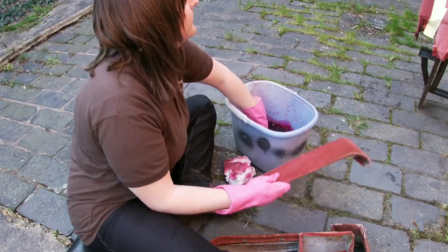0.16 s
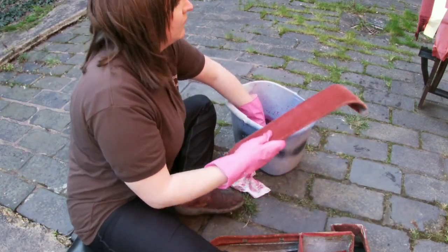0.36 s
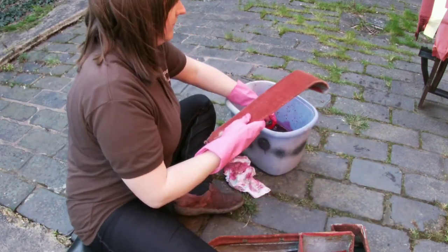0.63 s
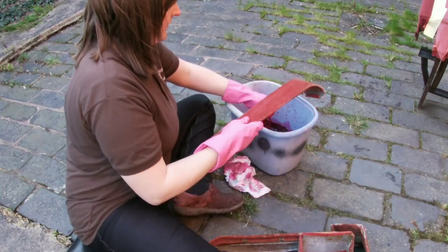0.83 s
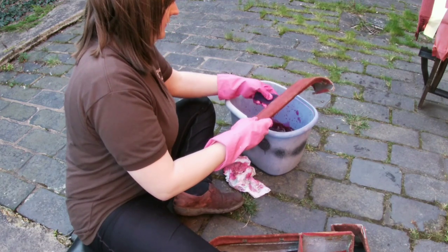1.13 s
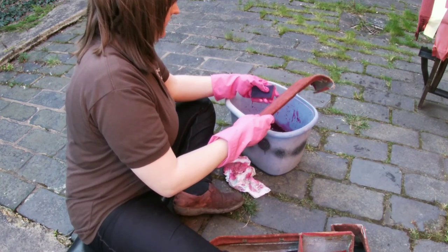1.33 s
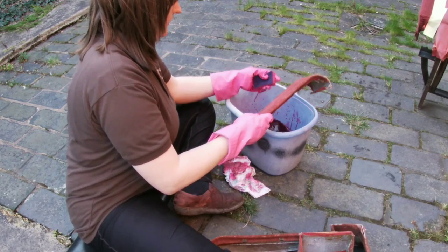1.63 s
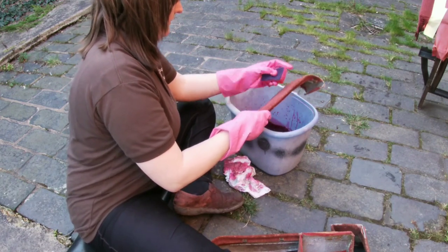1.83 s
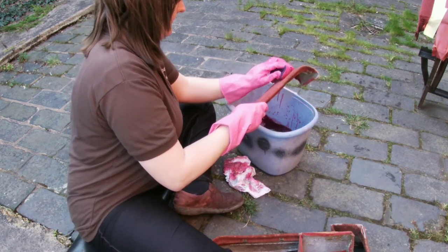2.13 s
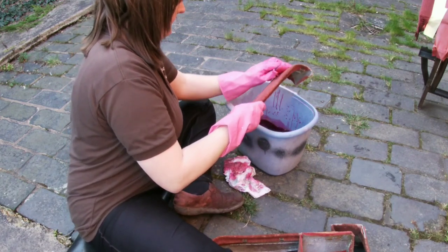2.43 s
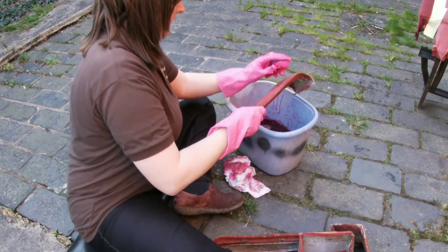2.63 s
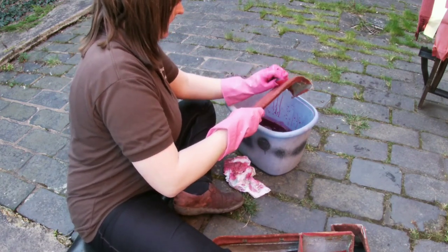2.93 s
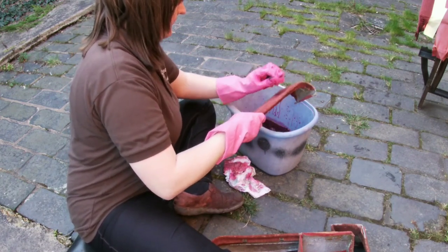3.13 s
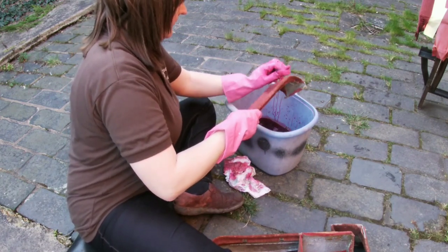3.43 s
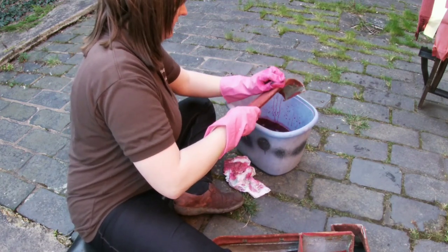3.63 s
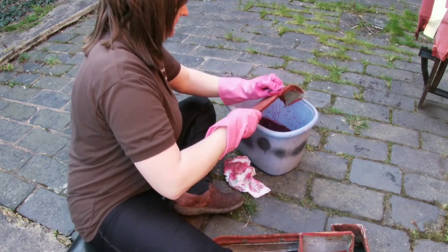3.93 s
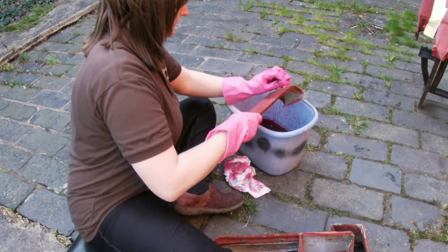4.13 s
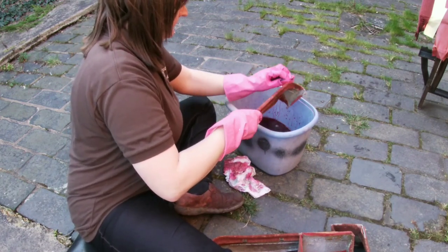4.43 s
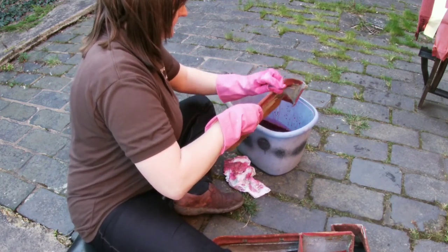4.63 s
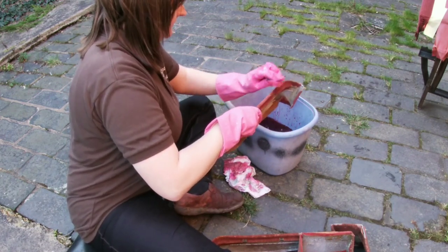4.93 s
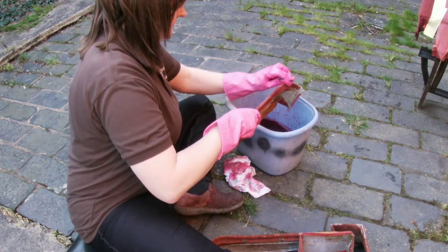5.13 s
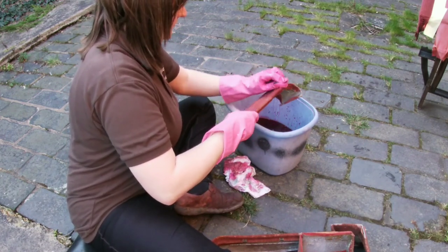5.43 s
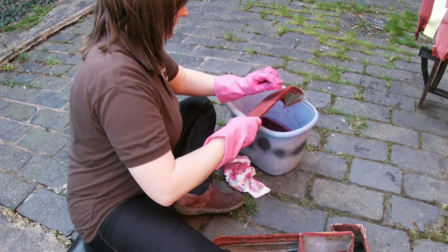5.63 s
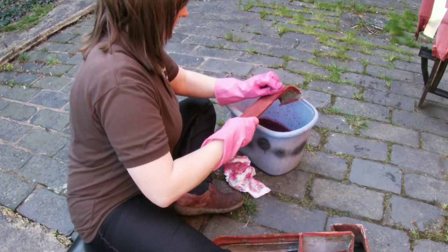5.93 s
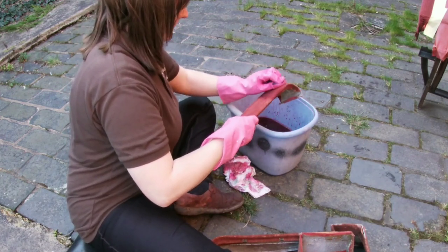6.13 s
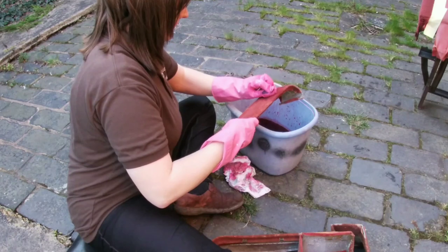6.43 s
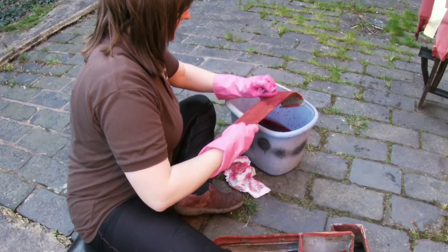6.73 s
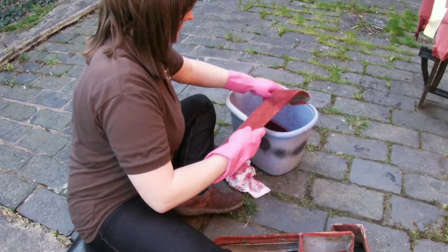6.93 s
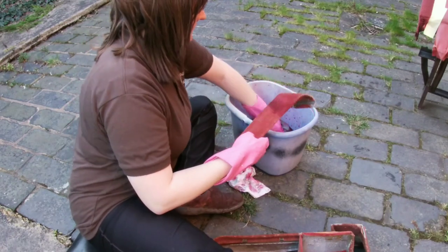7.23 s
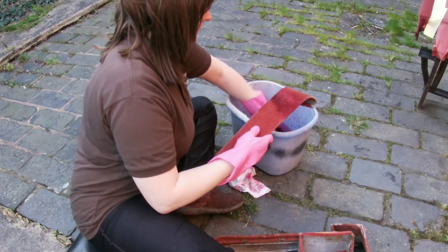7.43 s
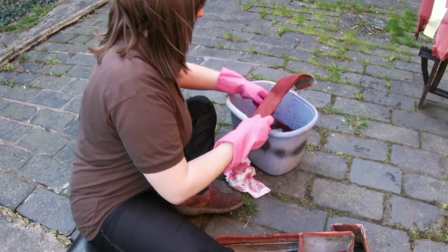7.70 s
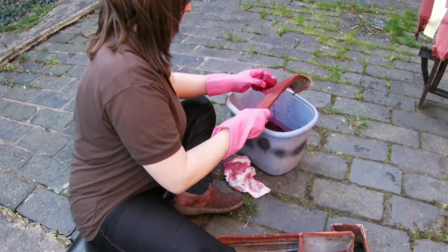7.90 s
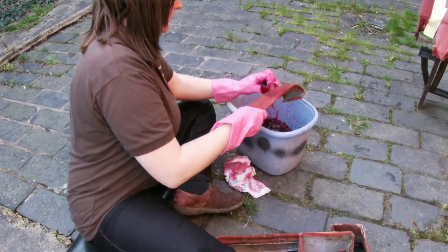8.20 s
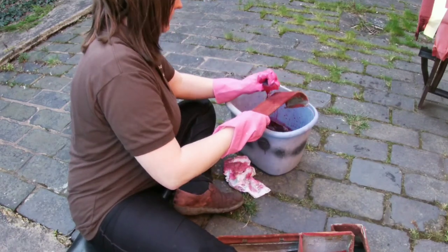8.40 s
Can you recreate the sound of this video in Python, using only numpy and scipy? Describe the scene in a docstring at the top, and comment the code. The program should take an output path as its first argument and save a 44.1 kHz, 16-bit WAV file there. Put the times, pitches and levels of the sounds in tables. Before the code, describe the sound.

Outdoors in a paved yard, low wind rumble, a steady idling engine near the bottom of hearing, a propeller plane's deep drone and faint traffic rush run throughout. At 0 s small drops patter and thin out; from 0.9 to 1.3 s a bright trickle with plinking bubbles falls from a sponge into a plastic bucket. From 2 s the wet sponge wipes a wooden slat in soft, hissy strokes, about three a second, airy and fizzy. A soft bucket tap comes near 3.9 s, a car passes faintly around 4.3 s, and birds chirp and whistle from 4 to 6 s. Wind thumps strengthen from 4.5 to 7.6 s, while a very faint wavering whine appears. Strokes become short and quick from 5.9 to 6.9 s. At 7.1 to 7.5 s water swishes around the hand; from 7.7 s drops plink again, swelling into a trickle at 8.5 s.

```python
"""Water drips off a wet sponge lifted from a plastic bucket; the sponge then wipes a wooden slat in a paved yard.
Wind gusts buffet the microphone, an engine idles, a propeller plane drones past, birds call, traffic rushes.
A thin far whine wavers behind the second half. Wind, hiss and traffic are shaped noise under level curves;
engines, whine and birds are sines on pitch curves; drops are noise bursts and decaying, gliding sines."""
import sys
import numpy as np
from scipy import signal
from scipy.fft import rfft, irfft, next_fast_len
from scipy.io import wavfile
from scipy.ndimage import uniform_filter1d, map_coordinates

SR = 44100
rng = np.random.default_rng(int(sys.argv[2]) if len(sys.argv) > 2 else 0)


def to_wav(s):
    """Save 16-bit WAV."""
    ch = np.atleast_2d(s).T  # columns
    pcm = np.round(np.clip(ch, -1, 1) * 32767)  # PCM
    wavfile.write(sys.argv[1], SR, pcm.astype(np.int16))


N = 377496

# Wind strength between eddies. Each row: time in seconds, strength in dB.
WIND_STRENGTH_DB = [(0, -42), (.25, -49), (1.0, -41), (1.45, -52), (2.1, -46), (2.45, -38), (2.75, -45),
                    (3.55, -39), (4.0, -34.5), (4.45, -45), (4.6, -38), (5.05, -35), (5.22, -44),
                    (5.5, -26.5), (6.1, -30), (6.3, -40), (6.55, -36), (6.7, -42), (6.98, -47), (7.1, -41),
                    (7.55, -33), (7.85, -44), (8.1, -49), (8.25, -49), (8.56, -48)]
# Strength at which rumble and flutter have these base levels; flutter growth in dB per dB of strength.
CALM_DB, RUMBLE_DB, FLUTTER_DB, FLUTTER_GROWTH = -45, -47.5, -47, 0.3
# Slowest pressure swings. Each row: time in seconds, mean level in dB.
HEAVE_LEVEL_DB = [(0, -35), (.8, -36.5), (1.8, -39), (2.5, -37), (3.8, -35), (4.2, -33), (4.7, -38),
                  (5.5, -34.5), (6.3, -35.5), (6.9, -38.5), (7.1, -31.5), (8.56, -42)]
# Heave spectrum. Each row: frequency in Hz, relative density in dB per Hz.
HEAVE_SPECTRUM_DB = [(6, 7), (18, 0.5), (38, 8.5), (55, 4.5), (65, 1), (95, -43)]
# Rumble spectrum. Each row: frequency in Hz, relative density in dB per Hz.
RUMBLE_SPECTRUM_DB = [(25, -21), (50, 8.5), (70, 5), (105, 2.5), (140, -9.5), (300, -72.5)]
# Flutter spectrum. Each row: frequency in Hz, relative density in dB per Hz.
FLUTTER_SPECTRUM_DB = [(60, -10.5), (110, 1.5), (160, -3), (220, -10.5), (320, -27), (600, -50.5),
                       (900, -81)]
# Large eddies. Each row: centre in seconds, rise and fall time (each) in seconds, rumble in dB, flutter in dB.
EDDIES = [(0.007, 0.067, -32, -36), (0.73, .18, -33.5, -40.5), (2.075, 0.14, -40, -55),
          (2.417, 0.21, -35.5, -36.5), (3.037, 0.18, -33.5, -40.5), (3.94, 0.097, -38, -32.5),
          (4.05, .07, -42, -37.5), (4.176, 0.15, -31, -40.5), (4.355, 0.045, -37, -32),
          (4.559, 0.13, -23, -33), (4.728, 0.064, -23.5, -36.5), (4.81, 0.048, -23, -27.5),
          (4.879, 0.064, -20.5, -34), (4.987, 0.096, -25.5, -30), (5.115, .1, -24.5, -24),
          (5.344, 0.092, -25.5, -30), (5.557, 0.24, -25, -37), (5.738, 0.039, -19.5, -39),
          (5.793, 0.047, -25, -30), (5.873, 0.084, -23, -48), (6.144, 0.16, -22, -27.5),
          (6.387, 0.077, -24, -29), (6.502, 0.071, -25.5, -21.5), (6.55, 0.078, -19, -28),
          (7.122, 0.079, -18.5, -29), (7.216, 0.058, -20, -23), (7.33, 0.066, -25, -29),
          (7.404, .07, -18.5, -37), (7.511, 0.078, -17, -28.5), (7.635, 0.2, -29, -40.5),
          (7.764, 0.17, -23.5, -39), (8.037, 0.19, -29.5, -43)]
# Sharp gusts. Each row: time in seconds, level at the top in dB, length in seconds (a third of it is the rise).
GUSTS = [(4.532, -41, 0.026), (4.756, -34, 0.026), (4.796, -34, 0.04), (4.887, -37, 0.024),
         (5.091, -23.5, 0.01), (5.367, -34, 0.024), (5.53, -32, 0.021), (5.721, -24, 0.015),
         (5.768, -24, 0.021), (5.867, -33, 0.0264), (5.91, -38.5, 0.055), (5.954, -38, 0.045),
         (6.09, -35, .03), (6.175, -17, 0.018), (6.362, -29.5, 0.042), (6.481, -21, 0.025),
         (6.527, -19, 0.019), (7.152, -29, 0.028), (7.194, -21, 0.033), (7.225, -27.5, 0.023),
         (7.319, -32.5, 0.019), (7.401, -32, 0.033), (7.517, -57, .034), (7.559, -32, 0.034)]
SLAP_HZ, SLAP_WIDTH_HZ = 170, 171

# Propeller plane. Each row: time in seconds, first blade tone in dB, second in dB.
PLANE_DB = [(0, -45.5, -50.5), (.3, -45, -53.5), (.75, -36.5, -37.5), (1.1, -36.5, -40),
            (1.24, -37.5, -52.5), (1.35, -38.5, -47), (2.4, -36, -44.5), (2.7, -36, -45.5),
            (3.05, -33, -40), (3.4, -31, -42), (3.75, -34, -43.5), (4.8, -29, -42), (5.2, -34.5, -49),
            (5.85, -35, -41), (6.9, -38, -44), (7.5, -35.5, -52), (8, -53, -48.5), (8.56, -51, -58)]
BLADE_START_HZ, SINK_HZ_PER_S = 107.65, .44
# Idling engine. Each row: time in seconds, firing tone in dB, half-order in dB.
IDLE_DB = [(0, -41.5, -44), (1, -37.5, -66), (2, -39, -41), (3, -36, -71), (4, -40.5, -42),
           (5.5, -35.5, -28), (7, -35.5, -51.5), (8.56, -37, -42)]
# Mean rate, then depth, period and first top of the hunting.
FIRING_HZ, HUNT_HZ, HUNT_S, FASTEST_S = 51.8, .7, 2.8, .35

# Far traffic. Each row: time in seconds, rush in dB, drone in dB.
TRAFFIC_DB = [(0, -52.5, -56.5), (1.1, -53.5, -59), (1.5, -55.5, -60.5), (3.0, -54.5, -59.5),
              (3.55, -53.5, -62), (3.98, -51, -59.5), (5.0, -56.5, -61.5), (5.93, -55.5, -63),
              (6.32, -54, -60), (6.67, -56, -62), (6.96, -54, -58.5), (8.27, -53.5, -58.5),
              (8.56, -53, -56)]
# Rush spectrum. Each row: frequency in Hz, relative density in dB per Hz.
ROAD_SPECTRUM_DB = [(200, -44.5), (450, -0.5), (600, -1.5), (800, 0), (1050, -2.5), (1400, -6),
                    (2200, -13.5), (4000, -34), (7000, -26.5), (11000, -21.5), (13000, -35), (16000, -45)]
# Drone spectrum. Each row: frequency in Hz, relative density in dB per Hz.
DRONE_SPECTRUM_DB = [(150, -21), (240, 0.5), (340, -0.5), (430, -3.5), (600, -35)]
# Car passing in the next street. Each row: time in seconds, level in dB.
CAR_DB = [(0, -88), (2.5, -62), (3.7, -66), (4.25, -51), (4.5, -57), (4.85, -57.5), (5.3, -65), (7, -67.5),
          (8.56, -73)]
# Tyre resonances. Each row: centre in Hz, width in Hz, relative gain in dB.
TYRES = [(503, 30, -7), (770, 95, -7.5), (1024, 22, 1.5)]

# Water off hand and sponge. Each row: time in seconds, droplets per second, base droplet level in dB, hiss in dB.
TRICKLE = [(0, 120, -52, -50.5), (.12, 100, -45, -56), (.4, 60, -50, -57), (.75, 25, -71, -64),
           (.9, 150, -59, -61), (.95, 740, -51, -50.5), (1.1, 900, -55, -50.5), (1.16, 1360, -44, -45),
           (1.24, 900, -47.5, -54.5), (1.32, 80, -73, -60.5), (1.93, 5, -67, -63.5), (2.05, 1, -72, -90),
           (7.5, 0.92, -80, -90), (7.65, 44, -51, -82), (7.9, 67, -49, -62), (8.33, 102, -68, -59.5),
           (8.42, 360, -63, -54), (8.5, 640, -46, -50.5), (8.56, 330, -46.5, -57)]
# Drops and wet clicks. Each row: time in seconds, dent level before its fade in dB, dent centre in Hz,
# spray over the dent in dB.
SPLATS = [(.0413, -38, 6000, -5), (.68, -45, 5000, -12), (.748, -61, 4000, 20.5), (.864, -62, 4000, 20),
          (.0997, -35, 2250, -12), (0.1893, -38, 3080, -14), (.6449, -45.5, 3040, -8),
          (.8405, -42, 2870, -3), (.8854, -36, 3700, -8), (0.9242, -21.5, 3680, -13),
          (0.9565, -32, 3460, -11), (0.967, -44, 4350, 0), (.9904, -46, 2180, 3),
          (1.0087, -26.5, 2840, -12), (1.034, -34, 3000, -7), (1.0494, -36, 4270, -1),
          (1.0664, -39, 3280, 1), (1.0793, -31.5, 3330, -9), (1.132, -21.5, 2890, -9),
          (1.1377, -29, 2970, -13), (1.1545, -25, 2196, -7), (1.1794, -39, 2800, 7),
          (1.2013, -27, 1910, -7), (1.2287, -28.5, 3830, -5), (1.244, -37, 3200, -6),
          (1.2694, -51.5, 2120, 18), (1.31, -60, 3000, 19), (1.367, -58, 3000, 16), (1.5165, -59, 3100, 27),
          (1.616, -44, 4990, -2), (1.9265, -58, 1930, 26.5), (3.02, -38, 3500, -8),
          (3.2914, -42.5, 1990, -7), (3.45, -38, 2200, -10), (3.9514, -36, 1880, -21),
          (7.6614, -51.5, 2030, 10), (7.6885, -40.5, 5700, -14), (7.7458, -33.5, 1830, 0),
          (7.485, -41, 4200, -12), (7.858, -48, 1924, 10.5), (7.9203, -22, 4530, -13),
          (8.0431, -47, 2070, 4), (8.086, -28, 4300, -14), (8.1844, -56, 1925, 15), (8.2891, -51, 3310, 11),
          (8.3622, -37, 5350, 8.5), (8.3885, -36.5, 1900, -6), (8.3944, -36.5, 3860, -4),
          (8.421, -39, 2280, -2), (8.4292, -28, 3340, -1), (8.4522, -25, 4100, -3.5),
          (8.497, -29.5, 4060, -9), (8.5131, -34, 1890, -11), (8.537, -29, 4330, 3)]
SPLAT_T60_S = 0.02
# Air bubbles under the surface. Each row: start in seconds, first pitch in Hz, peak level before the onset in dB,
# 60 dB decay in seconds, share by which the pitch finally rises (negative: sinks).
BUBBLES = [(.146, 803, -38.5, 0.086, -0.0029), (.146, 1945, -38, 0.048, .02), (.31, 2600, -48, .04, .1),
           (.335, 2100, -48, .04, .05), (.055, 3500, -37, 0.027, 0.017), (.588, 3250, -47, .03, .05),
           (.813, 5100, -47, .025, -0.081), (.83, 4700, -47, 0.029, .05), (.927, 4180, -25, 0.023, 0.041),
           (1.152, 4250, -29, .03, .06), (1.138, 2895, -22, 0.028, .12), (1.161, 3900, -31, .025, 0.034),
           (1.067, 5160, -39, .02, .05), (1.088, 3500, -35, .03, .1), (1.104, 3170, -36, 0.027, 0.069),
           (1.174, 5300, -41, 0.023, .03), (1.196, 3150, -32, 0.028, .06), (1.229, 3720, -32, 0.019, 0.18),
           (.919, 3470, -34, .03, 0.041), (.950, 6000, -36, .03, 0.086), (.962, 1224, -42.5, .08, .05),
           (1.086, 1130, -25, 0.055, 0.6), (1.101, 754, -31, 0.087, 0.067),
           (1.1, 1460, -20.5, 0.017, -0.24), (1.148, 670, -34.5, 0.088, 0.036),
           (1.157, 1890, -35, 0.038, -0.25), (1.16, 1380, -27.5, 0.028, -0.6), (1.202, 777, -37, 0.14, .02),
           (1.204, 1902, -40, 0.049, -0.023), (1.254, 740, -28.5, 0.068, 0.00025),
           (7.656, 1280, -43.5, 0.062, .04), (7.748, 1460, -39, 0.043, 0.41), (7.858, 2890, -46, .03, .1),
           (7.88, 3540, -46, 0.041, 0.032), (7.927, 4590, -53, 0.23, 0.009),
           (7.95, 4630, -43, 0.046, 0.019), (8.079, 2480, -40, 0.024, 0.27),
           (8.087, 3520, -30, 0.032, 0.021), (8.086, 5170, -29, 0.024, 0.07), (8.115, 4630, -47, .03, .02),
           (8.145, 4130, -50, .04, .02), (8.388, 1396, -43, .03, .1), (8.425, 1920, -44, .04, .2),
           (8.506, 540, -36.5, 0.12, 0.01), (8.508, 1220, -34, 0.043, 0.091)]

# Bird notes. Each row: start in seconds, end in seconds, first Hz, last Hz, level in dB, trill depth as a share.
BIRDS = [(0.4, .545, 3800, 3730, -60.5, 0.013), (.41, 0.48, 3250, 3700, -58.5, 0.016),
         (0.43, 0.53, 4100, 3930, -67, .006), (.47, 0.54, 2530, 2550, -61.5, 0.013),
         (.61, 0.67, 4600, 4380, -61.5, 0.019), (3.885, 3.945, 7600, 8110, -63, .02),
         (4.077, 4.10, 8200, 7150, -58, .004), (4.165, 4.218, 7750, 6650, -55, 0.019),
         (4.32, 4.35, 8750, 8300, -64, 0.0075), (4.277, 4.36, 7850, 7550, -60, 0.009),
         (4.419, 4.438, 3050, 3050, -51, .005), (4.438, 4.466, 3400, 3580, -56, .005),
         (4.445, 4.596, 3690, 3700, -49, 0.012), (4.52, 4.656, 4420, 4570, -67, 0.0071),
         (4.613, 4.691, 2870, 3290, -51.5, 0.011), (4.66, 4.72, 3000, 3200, -57, .012),
         (4.68, 4.719, 3300, 3300, -53, 0.011), (4.732, 4.767, 3270, 3300, -53, 0.0067),
         (4.722, 4.792, 4090, 4280, -60, .008), (4.82, 4.898, 3553, 3550, -51.5, 0.0092),
         (4.90, 5.062, 3200, 3810, -64, 0.018), (5.036, 5.10, 3910, 3950, -67, .004),
         (5.077, 5.272, 7760, 7780, -54.5, .004), (5.272, 5.43, 7750, 7780, -67, .004),
         (5.26, 5.43, 7930, 7920, -65, 0.0037), (5.51, 5.64, 4100, 3950, -56.5, .05),
         (5.519, 5.7, 3800, 3650, -57.5, 0.048), (5.534, 5.577, 3640, 3600, -54, .015),
         (5.525, 5.56, 4000, 4130, -57, 0.031), (5.578, 5.59, 3100, 3280, -47, .004),
         (5.583, 5.62, 2900, 2970, -53, 0.016), (5.60, 5.70, 4500, 4440, -63, .004),
         (6.04, 6.08, 4480, 4460, -66, .01), (6.42, 6.503, 4580, 4520, -66, .012),
         (5.39, 5.47, 3640, 4000, -63.5, .012), (6.2, 6.33, 3620, 3800, -61, 0.018),
         (5.642, 5.70, 3280, 3280, -62, 0.0066), (5.68, 5.695, 3800, 4180, -56, .006),
         (5.702, 5.722, 3000, 3000, -49.5, .004), (5.783, 5.829, 3270, 3400, -47, 0.018),
         (5.762, 5.793, 3020, 3000, -54, .01), (5.838, 5.853, 2800, 2870, -50.5, 0.025),
         (5.83, 5.914, 3600, 3300, -61, 0.062), (5.909, 6.007, 2500, 2390, -61.5, .025),
         (7.434, 7.59, 3600, 3580, -68, 0.012)]

# Wiping strokes. Each row: fastest at seconds, speeding up in seconds, slowing down in seconds, body level in dB,
# treble fizz over the body in dB.
STROKES = [(2.04, 0.1, 0.11, -55, -4), (2.36, 0.21, 0.11, -59, 0), (2.55, 0.18, 0.092, -54.5, 0),
           (2.83, 0.13, .04, -65, 3), (3.04, 0.22, 0.072, -48.5, -2), (3.4, .11, 0.11, -47, -0.5),
           (3.76, .14, 0.16, -51, 1), (3.95, 0.042, 0.053, -56, -22), (4.13, 0.13, .13, -51.5, 2.5),
           (4.5, 0.14, 0.11, -52, 2.5), (4.85, .11, 0.1, -50, 2.5), (5.19, 0.097, 0.091, -53.5, 5.5),
           (5.55, 0.13, .11, -52, 1), (5.89, .09, .07, -54, 2.5), (6.03, .055, 0.046, -53, 2),
           (6.14, .04, 0.059, -52, 3), (6.27, 0.064, 0.06, -53.5, 2), (6.385, 0.049, 0.054, -53.5, 2),
           (6.495, 0.054, .048, -53, 1), (6.61, 0.064, 0.052, -52.5, 1), (6.72, 0.067, 0.058, -52, -1),
           (6.85, 0.086, 0.13, -52, 2.5)]
# Hiss body spectrum. Each row: frequency in Hz, relative density in dB per Hz.
FOAM_SPECTRUM_DB = [(700, -43), (1400, -4), (2200, -2.5), (4000, -4), (6500, -6.5), (8000, -8.5),
                    (10000, -43)]
# Treble fizz spectrum. Each row: frequency in Hz, relative density in dB per Hz.
FIZZ_SPECTRUM_DB = [(6000, -41), (7500, -3.5), (10000, 7), (12500, -2.5), (16000, -3.5)]
REST_DB = -67.5  # faint hiss as long as the sponge lies on the slat

# Thin far tone. Each row: time in seconds, level in dB.
WHINE_DB = [(0, -88), (3.8, -84), (4.2, -62.5), (5, -69.5), (5.5, -62), (6, -66.5), (6.8, -60), (7.3, -61),
            (7.7, -64), (8.56, -66)]
WHINE_HZ = 544.5

KNOCK_S = 3.93  # the slat taps the bucket wall
# Bucket wall modes. Each row: frequency in Hz, peak level before the onset in dB, 60 dB decay in seconds.
BUCKET_MODES = [(285, -34, .12), (472, -40.5, 0.1), (910, -43, .1), (1850, -43, 0.15)]

# Hand stirring the sponge in water. Each row: fastest at seconds, speeding up in seconds,
# slowing down in seconds, level in dB.
STIRS = [(7.13, 0.077, 0.18, -51.5), (7.35, 0.043, 0.058, -54.5), (7.445, 0.037, 0.078, -54)]
# Swish spectrum. Each row: frequency in Hz, relative density in dB per Hz.
SWISH_SPECTRUM_DB = [(700, -36), (1200, -3.5), (2200, -1), (4000, -4.5), (7000, -17), (10000, -13),
                     (12000, -26), (16000, -40)]

# Microphone response. Each row: frequency in Hz, gain in dB.
MIC_DB = [(20, 1), (6000, -4), (7900, -11), (9900, -5.5), (10800, -12), (11700, -18.5), (14400, -17.5),
          (14900, -37)]
MIC_TOP_HZ = 15200


def amp(db):
    """Gain of a level in dB."""
    return 10 ** (np.asarray(db) / 20)


def unit(x):
    """x at rms 1."""
    return x / np.sqrt(np.mean(x ** 2) + 1e-20)


def along(points, hz):
    """(Hz, value) points interpolated on a log frequency axis."""
    f, v = np.transpose(points)
    return np.interp(np.log(hz + 1), np.log(f + 1), v)


def curves(rows):
    """One value per sample for each column after the time."""
    s, *cols = np.transpose(rows)
    return [np.interp(np.arange(N) / SR, s, c) for c in cols]


def wobble(rate_hz):
    """A smooth random curve with rate_hz knots a second."""
    knots = rng.standard_normal(int(N * rate_hz / SR) + 4)
    return map_coordinates(knots, [np.arange(N) * rate_hz / SR])


def filtered(x, response):
    """x times a response of frequency."""
    m = next_fast_len(len(x) + 8192)
    return irfft(rfft(x, m) * response(np.fft.rfftfreq(m, 1 / SR)), m)[:len(x)]


def rush(spectrum, patchy_db):
    """Shaped noise of rms 1 with time-frequency patches of random gain."""
    z = signal.stft(rng.standard_normal(N + 512), nperseg=512)[2]
    field = uniform_filter1d(rng.standard_normal(z.shape), size=6, axis=0)
    field = uniform_filter1d(field, size=10, axis=1)
    noise = signal.istft(z * amp(patchy_db * unit(field)), nperseg=512)[1][:N]
    return unit(filtered(noise, lambda hz: amp(along(spectrum, hz))))


def resonance(hz, width_hz):
    """Response of a causal resonance of peak gain 1."""
    return lambda f: 1j * f * width_hz / (hz * hz - f * f + 1j * f * width_hz)


def add(track, s, sound):
    """Mix sound into track from time s."""
    part = track[max(round(s * SR), 0):][:len(sound)]
    part += sound[:len(part)]


def echoes(x, t60_s, wet_db):
    """x plus the diffuse answer of nearby walls: decaying noise after a 4 ms gap."""
    t = np.arange(SR // 2) / SR
    tail = rng.standard_normal(len(t)) * amp(-60 * t / t60_s) * (t > .004)
    return x + amp(wet_db) * signal.fftconvolve(x, tail / np.linalg.norm(tail))[:N]


def tone(hz):
    """A sine of rms 1 on a pitch curve, from a random phase."""
    return np.sqrt(2) * np.sin(2 * np.pi * (np.cumsum(hz) / SR + rng.random()))


def swing(fastest_s, rise_s, fall_s, sharp):
    """Speed of a movement that picks up and stops like a swing, peak 1."""
    first = max(round((fastest_s - rise_s) * SR), 0)
    last = min(round((fastest_s + fall_s) * SR), N)
    t = np.arange(first, last)
    phase = np.interp(t / SR - fastest_s, [-rise_s, 0, fall_s], [0, np.pi / 2, np.pi])
    out = np.zeros(N)
    out[t] = np.sin(phase).clip(0) ** sharp
    return out


def wind():
    """Over a slow heave, one strength drives lumpy rumble and flutter; eddies swell both, sharp gusts slap."""
    strength_db, = curves(WIND_STRENGTH_DB)
    over_db = strength_db - CALM_DB
    rumble = amp(RUMBLE_DB + over_db)
    flutter = amp(FLUTTER_DB + FLUTTER_GROWTH * over_db)
    for s, length_s, rumble_db, flutter_db in EDDIES:
        roll = swing(s, length_s, length_s, sharp=2.96)
        rumble = np.maximum(rumble, amp(rumble_db) * roll)
        flutter = np.maximum(flutter, amp(flutter_db) * roll)
    lumps = wobble(25)  # shared by rumble and flutter
    heave_db, = curves(HEAVE_LEVEL_DB)
    out = amp(heave_db + 2.1 * wobble(5)) * rush(HEAVE_SPECTRUM_DB, patchy_db=1.1)
    out += rumble * unit(amp(2.3 * lumps) * rush(RUMBLE_SPECTRUM_DB, patchy_db=1.5))
    out += flutter * unit(amp(2.34 * lumps) * rush(FLUTTER_SPECTRUM_DB, patchy_db=-1.6))
    t = np.arange(SR // 5) / SR
    slap = resonance(SLAP_HZ, SLAP_WIDTH_HZ)
    for s, db, length_s in GUSTS:
        eddy = filtered(rng.standard_normal(len(t)), lambda f: slap(f) ** 4)
        u = t / max(length_s / 3, .002)
        add(out, s - .004, amp(db) * unit(eddy) * u * np.exp(1 - u))
    return out


def plane():
    """Two blade tones an octave apart that sink as the plane flies off."""
    blade_hz = BLADE_START_HZ - SINK_HZ_PER_S * np.arange(N) / SR
    first_db, second_db = curves(PLANE_DB)
    first = amp(first_db + 0.71 * wobble(7.3)) * tone(blade_hz)
    return first + amp(second_db + 0.84 * wobble(6.7)) * tone(2 * blade_hz)


def idling_engine():
    """Firing tone, its half-order and a weak third harmonic, hunting slowly in rate."""
    t = np.arange(N) / SR
    firing_hz = FIRING_HZ + HUNT_HZ * np.cos(2 * np.pi * (t - FASTEST_S) / HUNT_S)
    firing_db, half_db = curves(IDLE_DB)
    out = amp(firing_db + 1.8 * wobble(6)) * tone(firing_hz)
    out += amp(half_db + 1.8 * wobble(3.5)) * tone(firing_hz / 2)
    return out + amp(firing_db - 20 + 3 * wobble(4)) * tone(3 * firing_hz)


def traffic():
    """Town noise from far off, and one car whose tyres sing in a few narrow bands."""
    rush_db, drone_db = curves(TRAFFIC_DB)
    car_db, = curves(CAR_DB)

    def tread(f):
        # neighbouring bands alternate in sign
        return sum((-1) ** k * amp(db) * resonance(hz, width_hz)(f) for k, (hz, width_hz, db) in enumerate(TYRES))

    car = unit(filtered(rng.standard_normal(N), tread))
    out = amp(rush_db + 1.3 * wobble(6)) * rush(ROAD_SPECTRUM_DB, patchy_db=1.1)
    out += amp(drone_db) * rush(DRONE_SPECTRUM_DB, patchy_db=3.0)
    return out + amp(car_db + 1.5 * wobble(6.8)) * car


def hiss(body_gain, fizz_gain):
    """Wet hiss, made grainy by bursting pores and films."""
    grain = amp(0.89 * wobble(700) + 0.85 * wobble(40))
    body = unit(grain * rush(FOAM_SPECTRUM_DB, patchy_db=.8))
    fizz = unit(grain * rush(FIZZ_SPECTRUM_DB, patchy_db=.6))
    return body_gain * body + fizz_gain * fizz


def trickle():
    """Tiny bubbles of random pitch, a few cycles each, over a thin hiss; small ones are higher and weaker."""
    rate_hz, level_db, hiss_db = curves(TRICKLE)
    luck = rng.random((2500, 4))  # columns: waiting time, smallness, life, loudness
    # random arrivals: exponential waits against the summed rate
    at = np.searchsorted(np.cumsum(np.abs(rate_hz)) / SR, np.cumsum(-np.log(luck[:, 0])))
    luck, at = luck[at < N], at[at < N]
    small, long, loud = luck[:, 1:2], luck[:, 2:3], luck[:, 3:]
    start_hz = 1800 * (7500 / 1800) ** small ** 1.3
    cycles = np.arange(SR // 50) / SR * start_hz
    life_cycles = 2.5 + 8 * long
    size = amp(level_db[at][:, None] + 7.7 * loud ** 3 - 4.4 * small)
    envelope = size * np.exp(-cycles / life_cycles) * (1 - np.exp(-cycles))
    grains = envelope * np.sin(2 * np.pi * cycles * (1 + .002 * cycles))  # pitch creeps up
    samples = at[:, None] + np.arange(SR // 50)
    beads = np.bincount(samples.ravel(), grains.ravel(), N + SR)[:N]
    return beads + hiss(amp(hiss_db), amp(hiss_db - 5.0))


def drops():
    """Drops are noise through a dent's resonance, a broad slap and spray; trapped air sings as a gliding bubble."""
    out, t = trickle(), np.arange(SR // 8) / SR
    for s, db, hz, spray_db in SPLATS:
        noise = rng.standard_normal((3, len(t)))
        fade = amp(-60 * t / SPLAT_T60_S) * (1 - np.exp(-t / 0.0015))
        dent = unit(filtered(noise[0], lambda f: resonance(hz, .25 * hz)(f) ** 2))
        slap = unit(filtered(noise[1], lambda f: resonance(1.4 * hz, 1.2 * hz)(f) ** 2))
        slap = slap * amp(-60 * t / 0.077)  # fades faster than the dent
        spray = unit(filtered(noise[2], lambda f: resonance(10000, 4200)(f) ** 2))
        add(out, s - .001, amp(db) * fade * (dent + amp(-6) * slap + amp(spray_db) * spray))
    for s, hz, db, t60_s, rise in BUBBLES:
        pitch_hz = hz * (1 + rise * t / (t + t60_s / 4))
        envelope = amp(db - 60 * t / t60_s) * (1 - np.exp(-t / 0.00084))
        add(out, s, envelope * np.sin(2 * np.pi * np.cumsum(pitch_hz) / SR))
    return echoes(out, t60_s=0.31, wet_db=-13.5)


def birds():
    """Thin gliding whistles, some trilled into a buzz, heard partly off the walls."""
    out, quaver, flicker = np.zeros(N), wobble(160), wobble(45)
    for start_s, end_s, first_hz, last_hz, db, trill in BIRDS:
        u = np.linspace(0, 1, round((end_s - start_s) * SR))
        at = round(start_s * SR) + np.arange(len(u))
        glide_hz = first_hz + (last_hz - first_hz) * u
        note = tone(glide_hz * (1 + trill * quaver[at]))
        add(out, start_s, amp(db + 2.2 * flicker[at]) * np.sin(np.pi * u) ** 0.2 * note)
    return echoes(out, t60_s=0.7, wet_db=-1.0)


def sponge():
    """Wet foam dragged over wood, catching on the grain; the fizz needs more speed than the body of the hiss."""
    body = amp(REST_DB) * swing(2.05, rise_s=.1, fall_s=5.05, sharp=.12)
    fizz = np.zeros(N)
    for *times_s, db, fizz_db in STROKES:
        body += amp(db) * swing(*times_s, sharp=1.0)
        fizz += amp(db + fizz_db) * swing(*times_s, sharp=1.34)
    catch = amp(0.8 * wobble(60))
    return hiss(catch * body, catch * fizz)


def whine():
    """A faint sine from far away, wavering in pitch and level."""
    level_db, = curves(WHINE_DB)
    return amp(level_db + 1.5 * wobble(12)) * tone(WHINE_HZ + 5 * wobble(14))


def knock():
    """One soft tap rings the modes of the plastic wall briefly."""
    out, t = np.zeros(N), np.arange(SR // 4) / SR
    ring = sum(amp(db - 60 * t / t60_s) * np.sin(2 * np.pi * hz * t) for hz, db, t60_s in BUCKET_MODES)
    add(out, KNOCK_S, ring * (1 - np.exp(-t / .004)))
    return out


def stir():
    """Water swishing round the hand: noise following its speed, duller than the wiping."""
    speed = sum(amp(db) * swing(*times_s, sharp=.7) for *times_s, db in STIRS)
    return speed * amp(1.7 * wobble(90)) * rush(SWISH_SPECTRUM_DB, patchy_db=2.0)


def scene():
    """Everything at one microphone."""
    background = wind() + plane() + idling_engine() + traffic() + birds() + whine()
    return (background + drops() + sponge() + knock() + stir())[None]


def record(dry):
    """The small microphone dips near 8 kHz, peaks near 10 kHz and keeps nothing above its band limit."""
    return filtered(dry[0], lambda hz: amp(along(MIC_DB, hz)) * (hz < MIC_TOP_HZ))[None]


dry = scene()
out = record(dry)
to_wav(out)
```